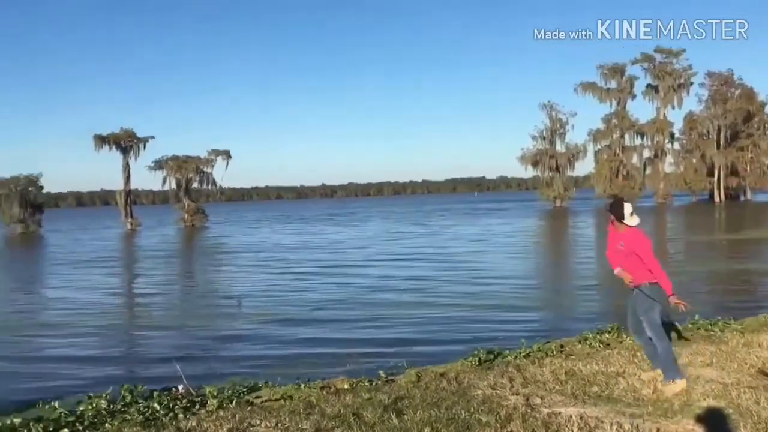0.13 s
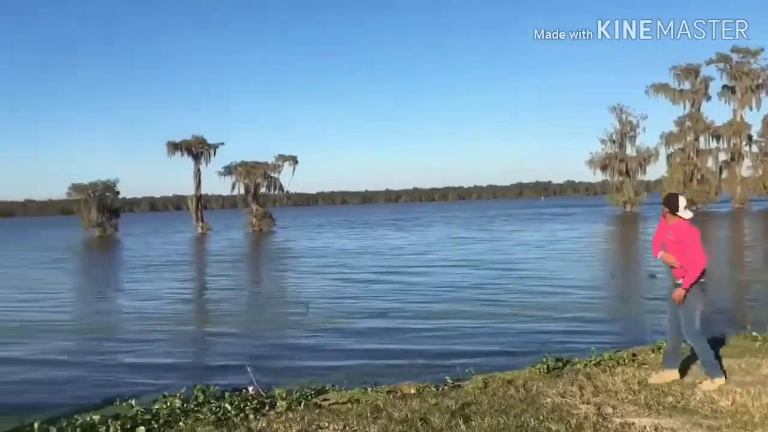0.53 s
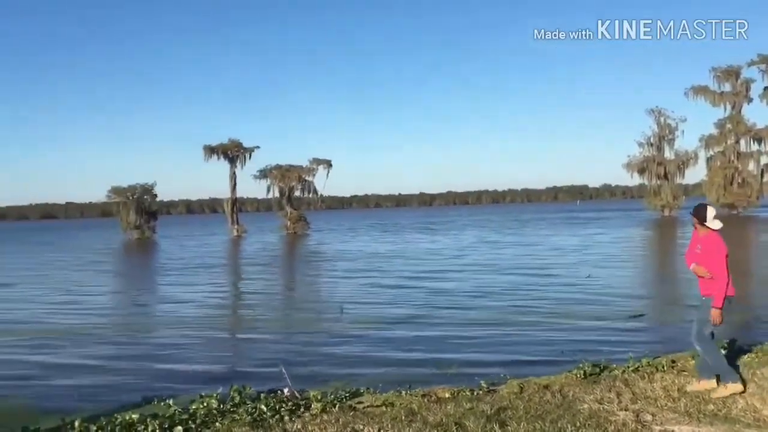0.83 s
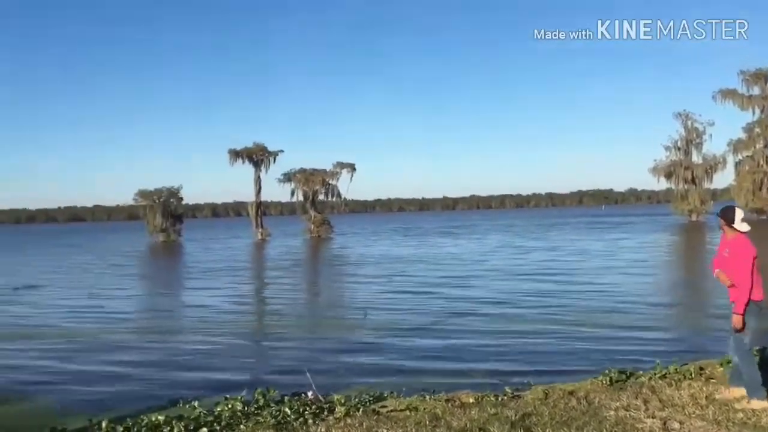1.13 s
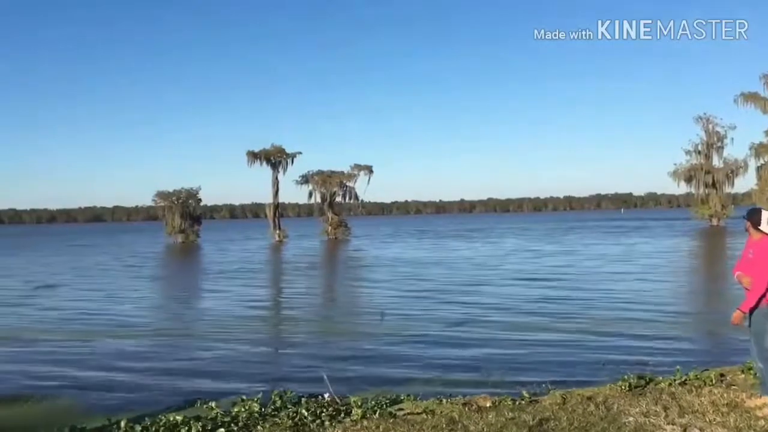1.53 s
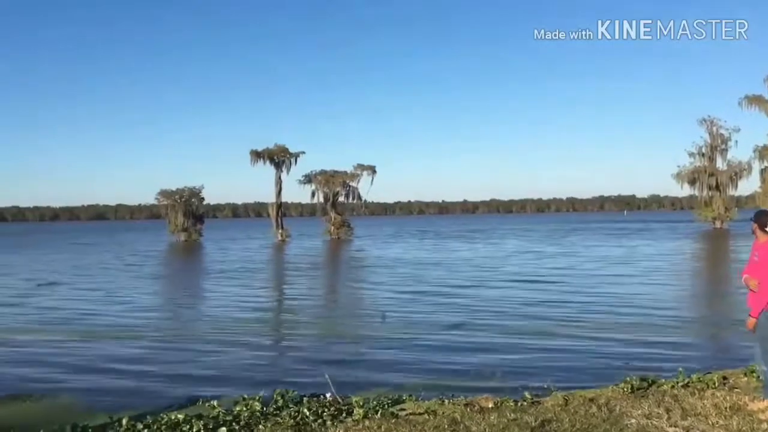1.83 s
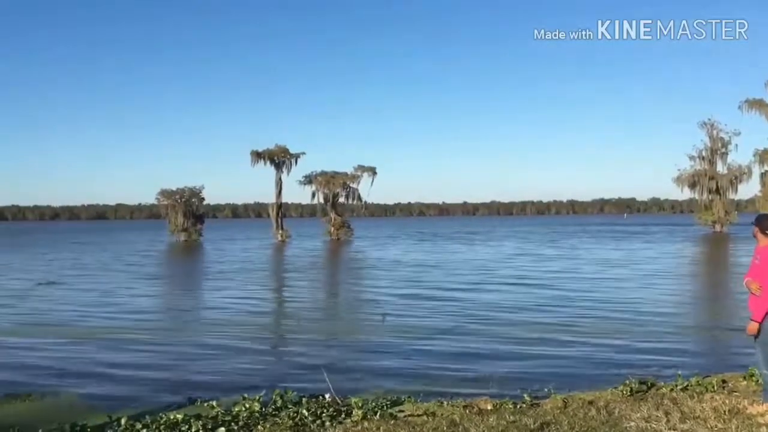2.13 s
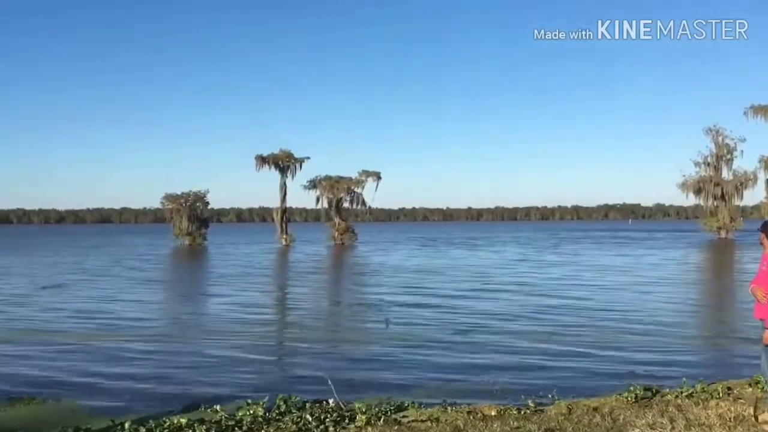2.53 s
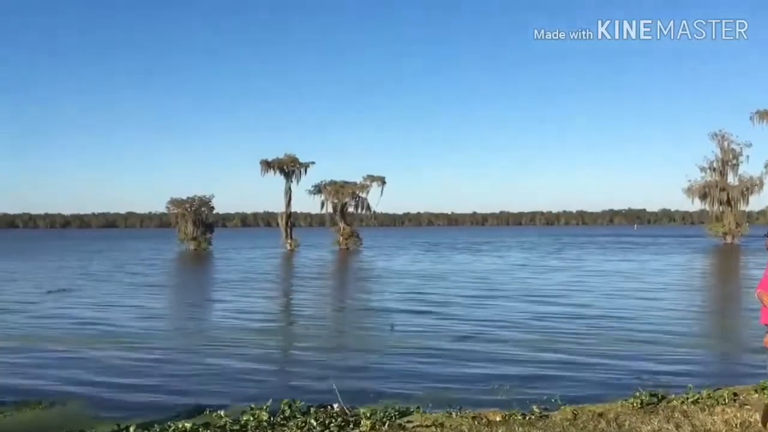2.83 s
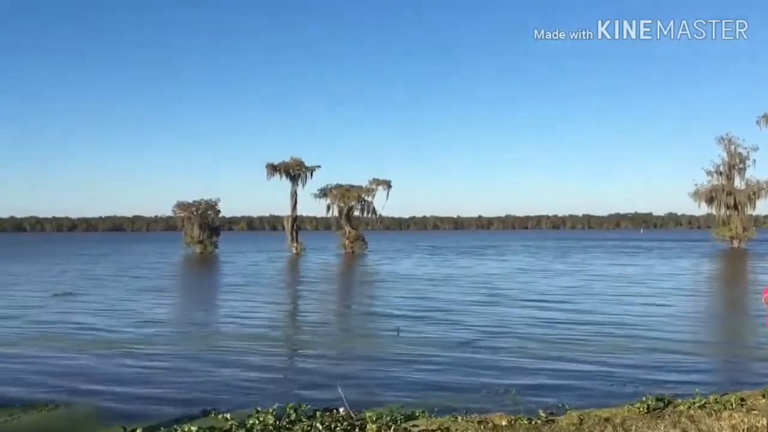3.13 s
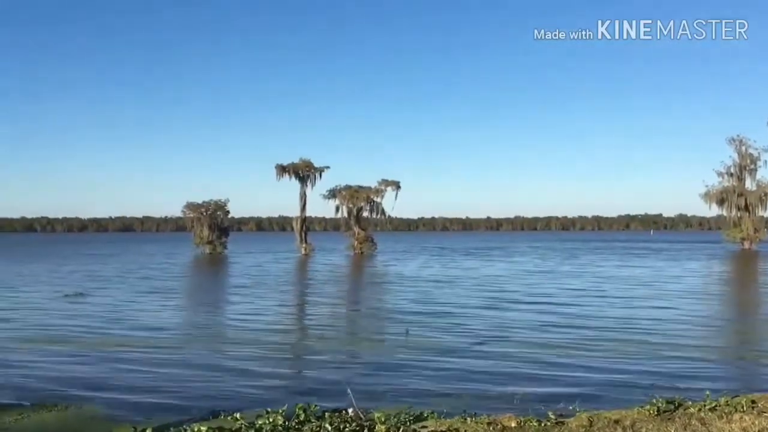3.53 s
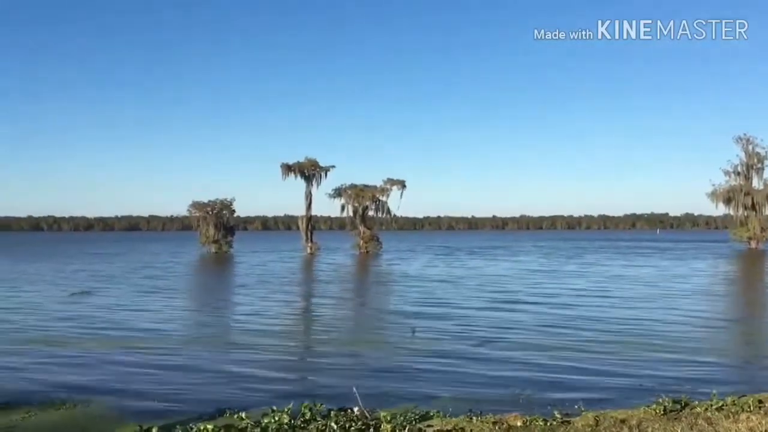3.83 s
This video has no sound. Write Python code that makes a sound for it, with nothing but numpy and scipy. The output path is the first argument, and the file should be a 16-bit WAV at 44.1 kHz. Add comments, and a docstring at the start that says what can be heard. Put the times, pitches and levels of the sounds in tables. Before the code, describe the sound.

A sling whirs and snaps as wind rumbles and thumps on the microphone.

```python
"""On a grassy lake bank, a sling's cord whirs as it stirs the air, then snaps free of its stone.
The thrower's clothes rustle, the loose cord ticks and feet crunch the dry grass.
Wind rumbles and thumps on the microphone throughout. Far off, water and trees hiss softly,
insects buzz, a faint hum hangs in the air, a bird whistles and the water plips twice."""
import sys
import numpy as np
from scipy import signal
from scipy.fft import rfft, irfft
from scipy.io import wavfile
from scipy.ndimage import uniform_filter1d

SR = 44100
rng = np.random.default_rng(int(sys.argv[2]) if len(sys.argv) > 2 else 0)


def store_wav(level_fs):
    """Save 16-bit WAV to argv[1]."""
    pcm = np.round(np.clip(np.atleast_2d(level_fs), -1, 1) * 32767)
    wavfile.write(sys.argv[1], SR, pcm.T.astype(np.int16))


N = 176400

# A LOUDNESS table follows a sound through time; a TONE table weighs its low and high parts.
# Wind between the thumps: t/s, level/dB
WIND_LOUDNESS = [(0, -21.5), (.045, -38), (.07, -41.5), (.12, -33.5), (.19, -41.5), (.22, -47.5),
                 (.36, -48.5), (.48, -57.5), (.56, -44), (.66, -42.5), (.78, -50), (.9, -44), (1.04, -50.5),
                 (1.2, -42.5), (1.5, -48), (1.6, -56), (2.1, -54), (2.4, -50), (2.55, -51), (2.7, -51),
                 (2.8, -54.5), (3.1, -49.5), (3.36, -54), (3.53, -41), (3.59, -31.5), (3.64, -44),
                 (3.72, -48), (3.84, -47.5), (3.93, -37.5), (4, -46)]
# Wind rumble: f/Hz, level/dB
WIND_TONE = [(12, -34.5), (20, -16), (48, 7), (77, -2), (117, -3), (259, -22.5), (344, -34), (381, -41.5),
             (600, -54.5), (780, -64), (1320, -120)]
# Brightening added when the wind is strong: f/Hz, level/dB
STRONG_WIND_TONE = [(100, -3), (400, 7)]
# Far water and trees: f/Hz, level/dB
WASH_TONE = [(120, -34), (200, -9), (508, -13), (759, -14.5), (1270, -14), (1380, -18), (2570, -20),
             (2880, -18.5), (3330, -22.5), (4590, -23.5), (5750, -29), (8590, -23), (9310, -18.5),
             (12100, -62), (20500, -120)]
# Insect buzz: t/s, level/dB
INSECT_LOUDNESS = [(0, -90.5), (1.0, -86.5), (1.3, -82.5), (2.1, -81), (2.3, -88), (2.7, -93.5),
                   (2.82, -76), (3.05, -87), (3.3, -84), (3.6, -86.5), (4, -89)]
# Whir of the swinging cord: t/s, level/dB, f/Hz
CORD_WHIR = [(0, -55, 1010), (.02, -59.5, 980), (.035, -56, 900), (.05, -49.5, 936), (.065, -58, 890),
             (.078, -52, 1240), (.095, -51, 990), (.108, -47, 894), (.13, -54.5, 850), (.152, -44, 955),
             (.17, -44, 800), (.19, -63, 730), (.21, -65, 700)]
# Clothes moving with the throw: t/s, level/dB
RUSTLE_LOUDNESS = [(0, -60.5), (.05, -59.5), (.15, -59.5), (.24, -57.5), (.3, -58.5), (.335, -63.5),
                   (.36, -60), (.42, -58), (.5, -66), (.6, -72.5), (.7, -70), (.9, -74), (1.0, -85),
                   (1.5, -76.5), (1.7, -100)]
# Rubbing cloth: f/Hz, level/dB
RUSTLE_TONE = [(240, -27.5), (400, -5.5), (881, 1), (1260, -5), (1490, -1), (4010, -7), (4820, -12),
               (8720, -12.5), (9310, -24), (12100, -67), (20500, -120)]
# Puffs of wind hitting the microphone: t/s, level/dB, f/Hz, sharp edge's level/dB
WIND_THUMPS = [(0.015, -19.5, 93.5, -29), (0.033, -19.5, 112.3, -28.5), (0.06, -31.5, 75, -70),
               (0.121, -21.5, 73, -45.0), (0.138, -20.5, 94, -35.5), (0.154, -22.5, 74, -32.5),
               (0.179, -15, 89.6, -29.5), (0.233, -34.5, 147.0, -59), (0.265, -38.5, 132, -48),
               (0.337, -37.5, 87, -63), (0.567, -31, 162, -38), (0.59, -38, 197, -31),
               (0.6, -24, 75.6, -41), (0.628, -41, 72, -66), (0.658, -30, 76, -49),
               (0.881, -33.5, 95.5, -49.5), (0.893, -34.0, 63, -56), (0.928, -37, 71, -68),
               (0.943, -36.5, 116, -52), (0.97, -31.5, 87.0, -67), (1.082, -32.5, 89, -54),
               (1.119, -36, 122, -46), (1.216, -29.5, 167, -41.5), (1.251, -33, 59.0, -57),
               (1.292, -35.5, 112, -39.5), (1.306, -34, 82.0, -60), (1.355, -37.5, 66.5, -65),
               (1.372, -33.5, 59, -66), (1.408, -33.5, 94.0, -64), (1.431, -40.5, 105.0, -42),
               (1.466, -30.5, 161, -40.0), (1.507, -35.5, 68, -67), (1.536, -40, 77.0, -60),
               (2.154, -31.0, 68.4, -59), (2.233, -52, 69, -71), (2.309, -41.5, 197, -57),
               (2.441, -33.5, 105, -52), (2.471, -26, 78.5, -41.5), (2.598, -30.5, 88, -50),
               (2.617, -24, 87, -42.5), (2.64, -27, 130.5, -46), (2.687, -37.0, 81, -67),
               (2.708, -35.0, 65.0, -67.0), (2.885, -27, 89.6, -58.5), (2.901, -27.5, 70.0, -54),
               (3.146, -32, 81, -68), (3.304, -35, 61.6, -74), (3.407, -36.5, 68, -71),
               (3.497, -34, 80.6, -58), (3.525, -39.5, 87.5, -46.5), (3.571, -21.0, 149, -38),
               (3.608, -32, 77.5, -59.5), (3.652, -37.0, 66, -62), (3.668, -26.5, 91, -52.0),
               (3.771, -41, 80, -58.5), (3.797, -34, 63.0, -63), (3.849, -41, 134, -53),
               (3.869, -16.5, 122, -26), (3.9, -29, 68.4, -63), (3.913, -28, 96.0, -44),
               (3.933, -26.5, 97, -38.5)]
# Sharp edge of a thump: f/Hz, level/dB
EDGE_TONE = [(120, -15), (220, 10.5), (350, 1.5), (500, -16), (700, -25), (1000, -43.5), (1500, -63)]
# The cord snapping free: t/s, level/dB, f/Hz
CORD_SNAPS = [(0.1518, -25.5, 4040)]
# Ticks of loose cord and breaking stalks, and a low knock of wind at 0.592 s: t/s, level/dB, f/Hz
TICKS_AND_KNOCK = [(.171, -42.5, 1230), (.182, -41.5, 2410), (0.263, -47, 1790), (0.275, -44.5, 1270),
                   (0.2818, -40.5, 1580), (.296, -46, 3670), (0.297, -48, 1600), (0.358, -57, 1500),
                   (.592, -44, 584), (0.726, -50, 3400), (0.727, -50, 7450), (.731, -51.5, 417),
                   (0.806, -49, 1270), (0.813, -42, 3200), (0.8227, -46, 3500), (1.123, -53, 1040),
                   (1.49, -55, 2500)]
# Grass crushed underfoot: loudest moment t/s, length/s, level/dB, treble tilt/(dB per octave)
GRASS_CRUNCHES = [(0.208, 0.031, -51.5, 3.5), (0.266, .015, -60.5, -0.5), (0.29, 0.012, -63, -1),
                  (0.358, 0.047, -57.5, 0.5), (0.728, 0.016, -57, 1.5), (0.809, 0.08, -55.5, 0),
                  (1.122, 0.048, -52, -4), (1.212, .04, -64.5, 4.5), (1.362, 0.06, -65.5, 4),
                  (1.429, 0.11, -70, 4), (1.487, 0.044, -68.5, 2), (1.9, 0.018, -76, -8)]
# Dry grass: f/Hz, level/dB
CRUNCH_TONE = [(180, -38), (300, 6.5), (533, -4), (1180, -3), (2910, -9), (3210, -7), (5020, -15),
               (8660, -13), (9310, -19), (12100, -64), (20500, -120)]
# Bird notes: start t/s, length/s, level/dB, first f/Hz, target f/Hz
BIRD_NOTES = [(1.37, .12, -78, 3780, 3820), (1.52, .14, -76, 3830, 3720), (1.665, .19, -77, 3850, 3520),
              (1.895, .16, -76, 3690, 3640), (2.08, .17, -79, 3720, 3520), (2.385, .2, -78, 3840, 3530),
              (2.83, .11, -80, 3840, 3480), (3.25, .15, -79, 3750, 3490), (3.73, .15, -80, 3740, 3410)]
# Water plips: start t/s, level/dB, first f/Hz
WATER_PLIPS = [(2.376, -60.5, 2130), (2.458, -60.5, 1850)]

TIME = np.arange(N) / SR


def amp(db):
    """Turns decibels into a number to multiply by."""
    return 10 ** (np.asarray(db, float) / 20)


def evened(x):
    """Scales a signal to an average strength (rms) of 1."""
    return x / np.sqrt(np.mean(x ** 2) + 1e-20)


def tone_db(tone, hz):
    """Looks up a tone table's level at any frequency."""
    f, level = np.transpose(tone)
    return np.interp(np.log(hz + 1), np.log(f + 1), level)


def follow(rows, column=1):
    """Joins a time table's points with straight lines."""
    rows = np.asarray(rows, float)
    return np.interp(TIME, rows[:, 0], rows[:, column])


def add(mix, start_s, sound):
    """Mixes a sound in, cutting off what does not fit."""
    at = round(start_s * SR)
    part = mix[max(at, 0):][:len(sound) + min(at, 0)]
    part += sound[max(-at, 0):][:len(part)]


def shaped(x, tone, tilt_db=0):
    """Shapes a sound by a tone table, tilted around 2 kHz."""
    hz = np.fft.rfftfreq(len(x), 1 / SR)
    gain = amp(tone_db(tone, hz) + tilt_db * np.log2((hz + 1) / 2000))
    return evened(irfft(rfft(x) * gain, len(x)))


def drift(seconds):
    """A smooth random wobble; more seconds make it slower."""
    width = max(int(seconds * SR), 2)
    return evened(uniform_filter1d(uniform_filter1d(rng.standard_normal(N), width), width))


def fuzzy_note(hz, width_hz):
    """Noise narrowed to a band around a steady or moving pitch."""
    turn = np.exp(2j * np.pi * np.cumsum(hz * np.ones(N)) / SR)
    stage = [1, -np.exp(-np.pi * width_hz / SR)]
    slow_noise = signal.lfilter([1], np.convolve(stage, stage), rng.standard_normal(N) / turn)
    return evened((turn * slow_noise).real)


def crackle(count, per_s, spread_db, hiss):
    """Scattered clicks of uneven size over some hiss."""
    chance, size, side = rng.random((count, 3)).T
    clicks = (chance < per_s / SR) * amp(-spread_db * np.log(size + .03)) * np.sign(side - .5)
    return evened(clicks) + hiss * rng.standard_normal(count)


def wind_rumble():
    """Wind on the microphone rumbles unevenly, brighter in its strong moments."""
    strength, noise = drift(.02), rng.standard_normal(N)
    soft = WIND_TONE + [(1400, -120)]
    bright = [(hz, db + tone_db(STRONG_WIND_TONE, hz)) for hz, db in soft]
    blend = 1 / (1 + np.exp(-2 * strength))
    rumble = (1 - blend) * shaped(noise, soft) + blend * shaped(noise, bright)
    return amp(follow(WIND_LOUDNESS) + 2.5 * strength) * rumble


def water_and_trees():
    """Far water and trees blur into a patchy hiss that fades slightly."""
    frames, hz = N // 128 + 5, np.fft.rfftfreq(512, 1 / SR)
    real, imag, patches = rng.standard_normal((frames, 257, 3)).T
    patches = evened(uniform_filter1d(uniform_filter1d(patches, 3, 0), 5, 1))  # blur in pitch and time
    steady_db = tone_db(WASH_TONE, hz) - 40 * (hz < 150)
    flicker_db = (1.45 + 3.5 * hz[:, None] / 9000) * patches  # the treble flickers most
    spectrum = (real + 1j * imag) * amp(steady_db[:, None] + flicker_db)
    wash = signal.istft(spectrum, nperseg=512, noverlap=384)[1][:N]
    return amp(-69 - .5 * (TIME - 1.5)) * evened(wash)


def hum():
    """A faint low hum swells once, halfway through."""
    swell_db = 8 * np.exp(-((TIME - 2.02) / .24) ** 2)
    return amp(-66 + swell_db) * fuzzy_note(hz=122.9, width_hz=8)


def insects():
    """Insects make a high, wavering buzz that throbs 45 times a second."""
    throb = 1 + .2 * np.sin(2 * np.pi * 45 * TIME)
    loudness = amp(follow(INSECT_LOUDNESS) + 2.4 * drift(.03))
    return loudness * throb * fuzzy_note(hz=2900, width_hz=220)


def cord_whir():
    """The swinging cord sheds little swirls of air, heard as a fuzzy whistle."""
    swinging = TIME < CORD_WHIR[-1][0]
    return amp(follow(CORD_WHIR)) * swinging * fuzzy_note(follow(CORD_WHIR, column=2), width_hz=170)


def clothes_rustle():
    """Rubbing cloth makes a hiss full of tiny clicks."""
    loudness = amp(follow(RUSTLE_LOUDNESS) + 1.1 * drift(.0049))
    return loudness * shaped(crackle(N, per_s=2000, spread_db=3.5, hiss=2.6), RUSTLE_TONE)


def wind_thumps():
    """Each puff hits the microphone with a low, sagging thump and a sharp edge of noise."""
    out, t = np.zeros(N), np.arange(-2048, 2048) / SR
    lead_cycles, rise_cycles, fall_cycles, sag = .18, .3, .77, .33
    edge_lead_s, edge_width_s = .0018, .005
    for s, db, hz, edge_db in WIND_THUMPS:
        cycles = t * hz + lead_cycles
        swell = np.exp(-.5 * (cycles / np.where(cycles < 0, rise_cycles, fall_cycles)) ** 2)
        lag = .5 * sag * cycles * abs(np.tanh(cycles))
        thump = swell * np.cos(2 * np.pi * (cycles - lag + rng.random()))
        burst = np.exp(-.5 * ((t + edge_lead_s) / edge_width_s) ** 2)
        edge = burst * shaped(rng.standard_normal(len(t)), EDGE_TONE)
        add(out, s + t[0], amp(db) * thump + amp(edge_db) * edge / abs(edge).max())
    return out


def cord_snap():
    """The cord snaps free with a high ring that dies almost at once."""
    out, t = np.zeros(N), np.arange(600) / SR
    ring_s = .0016  # time to fade by 60 dB
    for s, db, hz in CORD_SNAPS:
        add(out, s, -amp(db - 60 * t / ring_s) * np.sin(2 * np.pi * hz * t))
    return out


def ticks_and_knock():
    """Loose cord and breaking stalks tick, and wind knocks the microphone once; each rings briefly."""
    out, t = np.zeros(N), np.arange(-4096, 4096) / SR
    for s, db, hz in TICKS_AND_KNOCK:
        swell = np.exp(-.5 * (t * hz) ** 2)
        add(out, s + t[0], amp(db) * swell * np.sin(2 * np.pi * (hz * t + rng.random())))
    return out


def grass_crunches():
    """Feet crush dry stalks in clumps of clicks that rise faster than they fade."""
    out, t = np.zeros(N), np.arange(-4096, 4096) / SR
    for s, length, db, tilt_db in GRASS_CRUNCHES:
        swell = np.exp(-.5 * (t / length / np.where(t < 0, .22, .33)) ** 2)
        stalks = crackle(len(t), per_s=700, spread_db=2, hiss=.77)
        add(out, s + t[0], amp(db) * swell * shaped(stalks, CRUNCH_TONE, tilt_db))
    return out


def bird():
    """A far bird whistles thin, fluttering notes; most slide down and settle."""
    out, glide_s = np.zeros(N), .045
    waver_hz, flutter_db = 18 * drift(.0029), 2.6 * drift(.006)
    for s, length, db, first_hz, target_hz in BIRD_NOTES:
        t, at = np.arange(0, length, 1 / SR), round(s * SR)
        hz = target_hz + (first_hz - target_hz) * np.exp(-t / glide_s) + waver_hz[at:at + len(t)]
        swell = np.sin(np.pi * (t / length) ** .45)
        add(out, s, amp(db) * swell * np.sin(2 * np.pi * np.cumsum(hz) / SR))
    return out * amp(flutter_db)


def water_plips():
    """The water plips in short notes that rise in pitch."""
    out, plip_s = np.zeros(N), .008
    age = np.arange(2000) / SR / plip_s
    swell = np.e * age * np.exp(-2 * age)
    for s, db, first_hz in WATER_PLIPS:
        hz = first_hz * (1 + .1 * age)
        add(out, s, amp(db) * swell * np.sin(2 * np.pi * np.cumsum(hz) / SR))
    return out


def scene():
    """Adds all the sounds into one channel."""
    wind = wind_rumble() + wind_thumps()
    background = water_and_trees() + hum() + insects()
    nearby = cord_whir() + clothes_rustle() + cord_snap() + ticks_and_knock() + grass_crunches()
    return (wind + background + nearby + bird() + water_plips())[None]


def record(dry):
    """The microphone loses the deepest bass and highest treble; its electronics add a faint hiss."""
    low_hz, high_hz = 35.2, 9230
    bass_cut = signal.butter(2, low_hz, "high", fs=SR, output="sos")
    treble_cut = signal.firwin(1023, high_hz, window=("kaiser", 9), fs=SR)
    out = signal.oaconvolve(signal.sosfilt(bass_cut, dry), treble_cut[None], "same")
    return out + amp(-102) * rng.standard_normal(out.shape)


dry = scene()
out = record(dry)
store_wav(out)
```